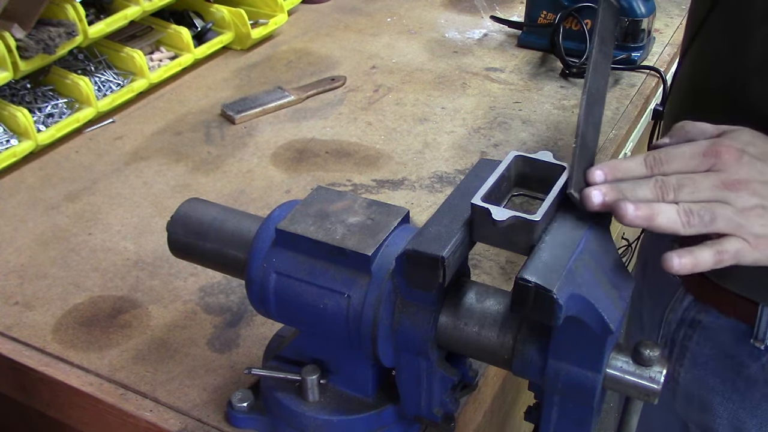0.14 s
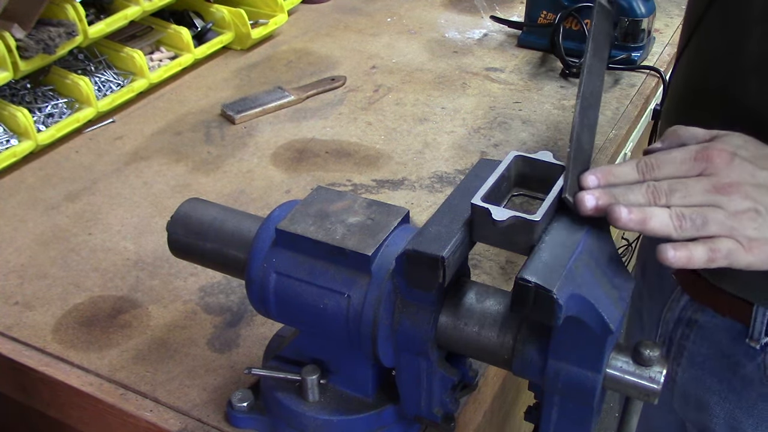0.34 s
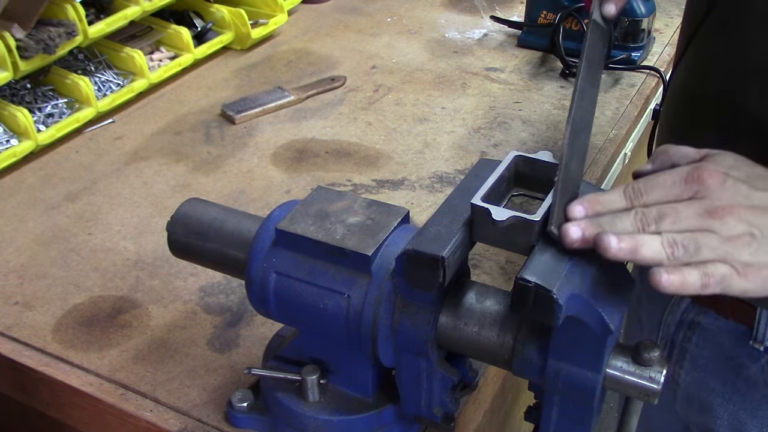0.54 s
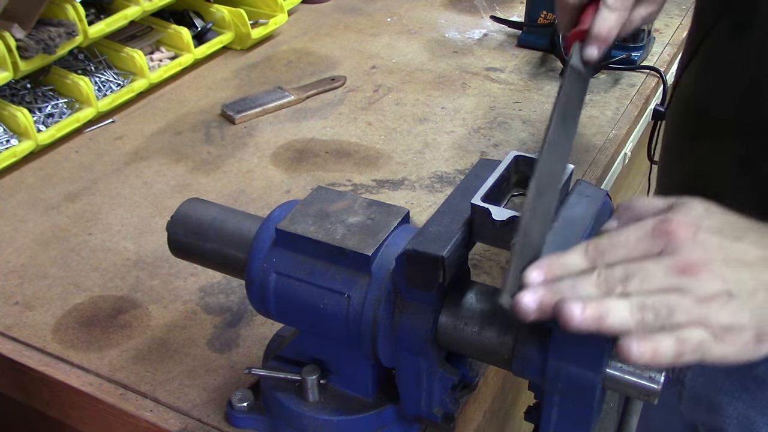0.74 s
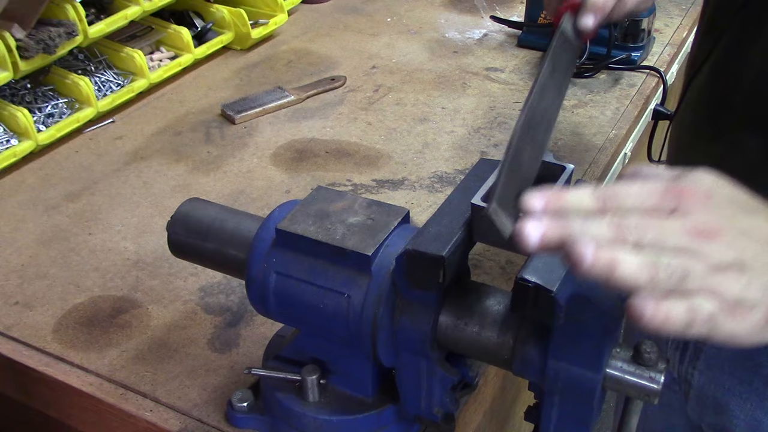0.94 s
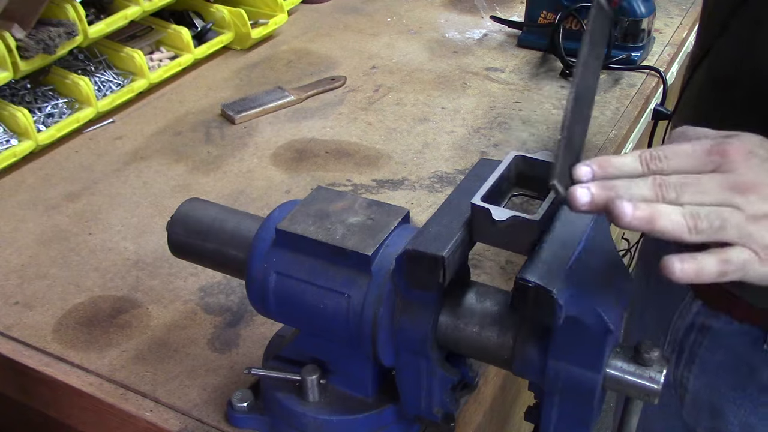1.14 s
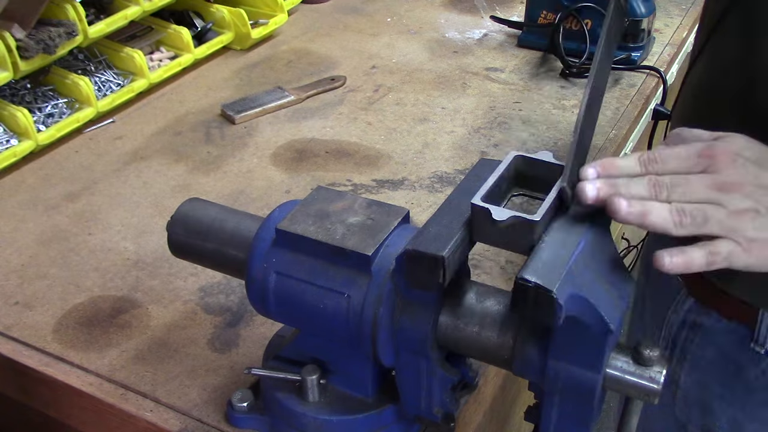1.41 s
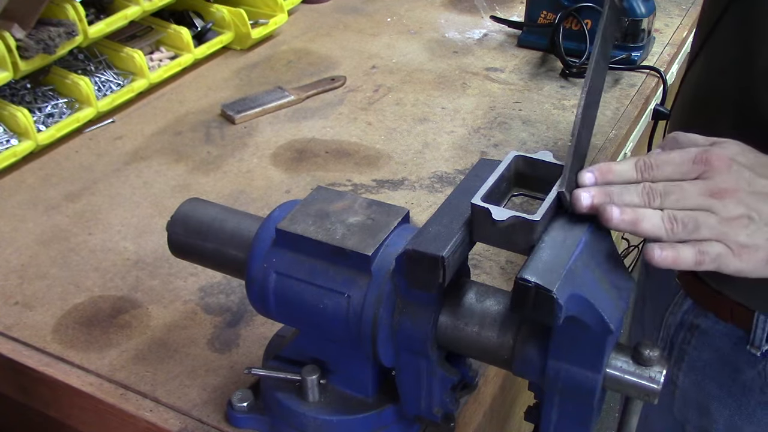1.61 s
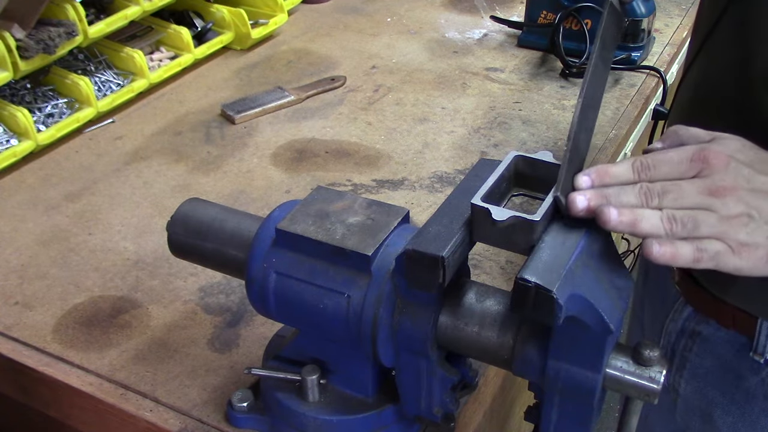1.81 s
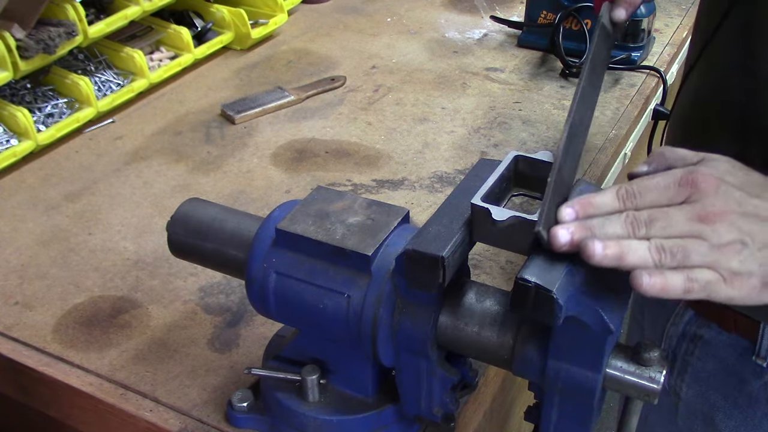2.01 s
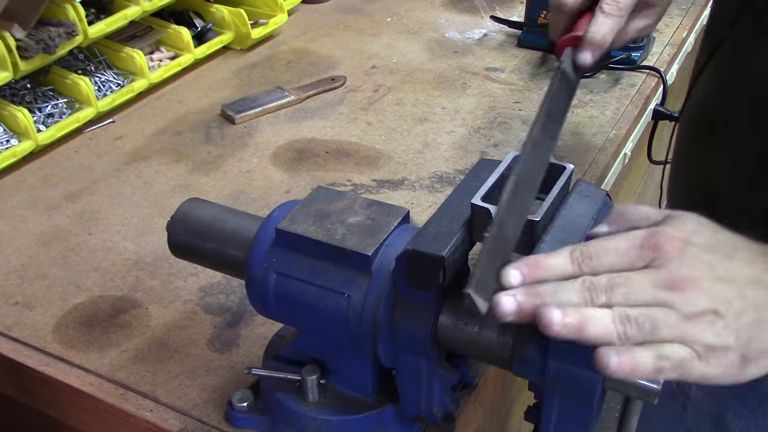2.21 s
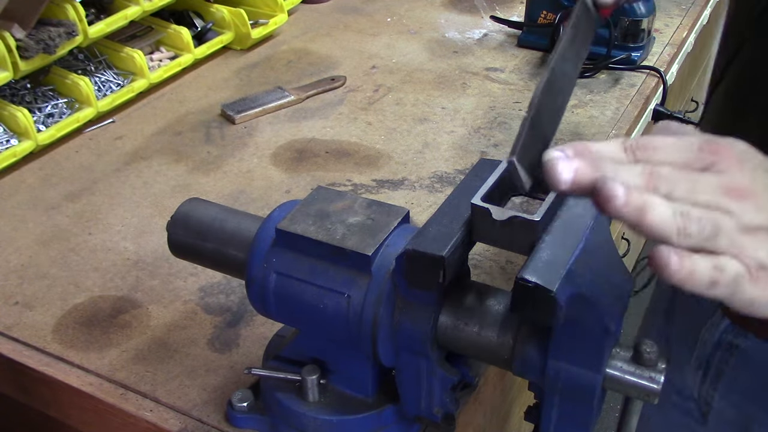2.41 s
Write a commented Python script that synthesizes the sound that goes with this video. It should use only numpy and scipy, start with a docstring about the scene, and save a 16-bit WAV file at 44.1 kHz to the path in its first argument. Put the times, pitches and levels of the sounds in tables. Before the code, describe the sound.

Two slow strokes of a file scrape on metal, each after a light tap.

```python
"""A hand file is set down with a tap on a metal casting held in a vice, then pushed across its edge.
Its teeth bite in a dense stream of impacts that ring the blade, whose modes change as the contact
travels from tip to heel. The teeth snag, or lock to the blade and squeal; thin tones ring on as the heel
slides off. The arms draw back with a swish, the bench sways, and the file touches down for a second
stroke. Throughout, the bench rumbles underneath and a small workshop reverberates."""
import sys
import numpy as np
from scipy import signal
from scipy.fft import rfft, irfft
from scipy.io import wavfile

SR = 44100
rng = np.random.default_rng(int(sys.argv[2]) if len(sys.argv) > 2 else 0)


def transcribe(signal):
    """Save signal, clipped to [-1, 1], as a 16-bit WAV file at the path in sys.argv[1]."""
    frames = np.atleast_2d(signal).T
    limited = np.clip(frames, -1, 1)
    pcm = np.round(limited * 32767).astype(np.int16)
    wavfile.write(sys.argv[1], SR, pcm)


N = 112454
T = np.arange(N) / SR

BRIGHT_PIVOT_HZ = 4250
FLUTTER_DB, FLUTTER_PER_S, JITTER_PER_S = 1.37, 89, 457
SCRATCH_DB, SCRATCH_HEEL_DB = -5.5, -3.5
VICE_DB, VICE_HEEL_DB, VICE_FOLLOW, VICE_FULL_DB = -39.5, -1.5, 0.54, -26
# spectrum of the teeth's dry scratch (frequency [Hz], spectral level [dB])
SCRATCH_SPECTRUM = [(150, -43.5), (500, -7), (1200, -11.5), (1850, -11), (2420, 2), (9000, -2.5),
                    (15800, -16.5)]
# one path per stroke (time [s], level [dB], brightness [dB/octave], contact place [0 tip to 1 heel])
STROKE_PATHS = [
    [(.37, -46.5, -3, 0.26), (.45, -29.5, -1.5, 0.13), (.5, -27, 0, 0.33), (.64, -24, 1.5, 0.32),
     (.69, -25.5, 2.5, 0.69), (.75, -22, 5, 0.88), (.82, -22, 2.5, 1), (.848, -23.5, 0.5, 0.92),
     (.862, -35, -4.5, 0.44)],
    [(1.79, -55, -1.5, 0.21), (1.84, -36.5, -3, 0.092), (1.92, -30.5, 0.5, 0.2), (2.0, -26.5, 1, 0.84),
     (2.09, -26, 1.5, 0.45), (2.15, -22, 3, 0.76), (2.198, -25, 4, 0.94), (2.218, -24, 4, 0.99),
     (2.242, -26, 5, 0.74), (2.256, -34.5, -1, 0.51)],
]
def stroke(path):
    """Impact excitation: the teeth scratch the edge, ring the blade and shake the vice."""
    times, *columns = np.transpose(path)
    level_db, bright_db, place = (np.interp(T, times, c) for c in columns)
    touching = (T > times[0]) * (T < times[-1])
    heel = np.clip(2 * place - 1, 0, 1)
    teeth = bites() * amp(-0.1 * wander(per_s=190)) * touching  # very slight judder
    push = teeth * amp(level_db)
    scratch = unit_rms(coloured(push, SCRATCH_SPECTRUM)) * np.std(push)
    treble = coloured(scratch, [(BRIGHT_PIVOT_HZ / 2, -30), (BRIGHT_PIVOT_HZ * 2, 0)])
    scratch += treble * (amp(2 * bright_db) - 1)
    scratch *= amp(SCRATCH_DB + SCRATCH_HEEL_DB * heel)
    vice_db = VICE_DB + VICE_FOLLOW * np.minimum(level_db - VICE_FULL_DB, 0) + VICE_HEEL_DB * heel
    return blade(push, place, bright_db, FLUTTER_DB) + scratch + vice(teeth * amp(vice_db))


def bites(per_s=11000, spread_db=2):
    """Shot noise: the teeth make tiny impacts of uneven size at random instants."""
    size = amp(spread_db * np.minimum(rng.exponential(1, N), 5))
    return unit_rms(size * rng.choice([-1., 1.], N) * (rng.random(N) < per_s / SR))


STIFFEN_HZ, STIFFEN_JITTER = 1373, 0.54
# blade modes (frequency [Hz], bandwidth [Hz], weight for contact at tip [dB], middle [dB], heel [dB])
BLADE_MODES = [(2544, 97, -8.5, -1, 2), (2930, 120, -12, 0.5, 1.5), (3573, 170, -5.5, -13.5, -4),
               (5170, 137, 10, -4, -4.5), (5110, 350, 3.5, -1, -3.5), (6300, 148, -14, 1.5, -0.5),
               (6965, 220, -16, -19, -2), (8083, 100, -9.5, -7.5, 0), (9810, 120, -17, -16.5, -2.5),
               (10850, 330, -29, -9.5, -6.5), (12010, 440, -31, -19, -19)]
def blade(push, place, bright_db, flutter_db=0):
    """Modal superposition: the place of contact sets how strongly each mode is driven."""
    # contact mid-blade is an unsteady spring that raises and smears the low modes
    spring = np.sin(np.pi * np.clip(place, 0, 1) ** 0.81) ** 2
    spring *= np.maximum(1 + STIFFEN_JITTER * wander(JITTER_PER_S), 0)
    ringing, power = np.zeros(N), 0
    for k, (hz, width, *by_place) in enumerate(BLADE_MODES):
        weight = amp(np.interp(place, [0, .5, 1], by_place))
        flutter = flutter_db * wander(FLUTTER_PER_S) if flutter_db else 0
        gain = amp(bright_db * np.log2(hz / BRIGHT_PIVOT_HZ) + flutter)
        stiffened_hz = np.sqrt(hz ** 2 + spring * STIFFEN_HZ ** 2)
        ringing += (-1) ** k * ring(push * weight * gain, stiffened_hz, width)
        power += weight ** 2
    return ringing / np.sqrt(power)


# squeals (time [s], duration [s], start [Hz], end [Hz], rms wobble [Hz], level [dB])
SQUEAL_TONES = [(.41, .165, 5200, 5450, 240, -29.5), (.748, .114, 5330, 5030, 150, -24),
                (.795, .05, 8140, 8130, 70, -26.5), (2.17, .082, 5330, 5030, 170, -28),
                (2.2, .052, 2550, 2600, 75, -25), (2.207, .043, 9750, 9700, 230, -27)]
def squeal(s, length, start_hz, end_hz, wobble_hz, db):
    """Self-sustained oscillation: the teeth lock to the blade in a tone that slides and flutters."""
    along = progress(s, length)
    hz = start_hz + (end_hz - start_hz) * along + wobble_hz * wander(JITTER_PER_S)
    swell = np.sqrt(2 * np.maximum(np.sin(np.pi * along), 0))
    return amp(db + FLUTTER_DB * wander(FLUTTER_PER_S)) * swell * np.sin(phase(hz))


# snags of the teeth (time [s], duration [s], level [dB])
SNAGS = [(.655, .025, -27), (.681, .009, -16), (.692, .005, -14), (.6985, .004, -13), (.731, .006, -23)]
def snags(cutoff_hz=9700, knock_db=-15):
    """Pulsed excitation: snagging teeth bite harder, scratching, ringing the blade and jarring the vice."""
    force = sum(amp(db) * np.sqrt(np.maximum(np.sin(np.pi * progress(s, length)), 0))
                for s, length, db in SNAGS)
    push = bites() * force
    lowpass = signal.butter(2, cutoff_hz, fs=SR, output="sos")
    scratch = unit_rms(signal.sosfilt(lowpass, coloured(push, SCRATCH_SPECTRUM))) * np.std(push)
    return blade(push, place=0.06, bright_db=2.5) / 2 + scratch + amp(knock_db) * vice(push) / 2


TICK_DB, BOUNCE_S, BOUNCE_DB = -30.5, 0.001062, -9.5
ECHO_BURST_DB, ECHO_BURST_S = -18.5, 0.011
CASTING_HZ, CASTING_WIDTH_HZ, CASTING_DB = 550, 10, -11
# spectrum of the dense burst of early echoes after a tap (frequency [Hz], spectral level [dB])
ECHO_BURST_SPECTRUM = [(300, -30.5), (600, -10), (2000, -1.5), (5000, -4), (7800, -8.5), (9500, -29.5)]
# the file touches down (time [s], steel level [dB], brightness [dB/octave], knock level [dB])
TOUCHDOWNS = [(0.2421, 20, -3.5, -6), (1.4989, -1, -14.5, -4.5), (1.574, -19.5, -1, -27.5)]
def tap(s, db, bright_db, knock_db):
    """Impulse response: a blow with one bounce ticks and rings blade, vice and casting, and a short dense burst
    of early echoes follows."""
    blow = np.zeros(N)
    blow[round(s * SR)] = 1
    blow[round(s * SR) + round(BOUNCE_S * SR)] += amp(BOUNCE_DB)
    tick = signal.sosfilt(signal.butter(2, [550, 6500], "band", fs=SR, output="sos"), blow)
    decay = np.exp(-np.maximum(T - s, 0) / ECHO_BURST_S) * (T > s)
    echo_burst = coloured(rng.standard_normal(N), ECHO_BURST_SPECTRUM) * decay
    echo_burst /= np.linalg.norm(echo_burst)
    steel = blade(blow, 0, bright_db) / 2 + amp(TICK_DB) * tick + amp(ECHO_BURST_DB) * echo_burst
    knock = vice(tick) / 2 + amp(CASTING_DB) * ring(blow, CASTING_HZ, CASTING_WIDTH_HZ)
    return amp(db) * steel + amp(knock_db) * knock


# lightly damped blade modes (frequency [Hz], bandwidth [Hz], gain [dB])
FREE_MODES = [(2512, 10.6, -31.5), (8150, 7.5, -36.5)]
def after_ring(drive):
    """Free decay: narrow modes driven during the stroke ring on after the heel slides off."""
    return sum(amp(db) * ring(drive, hz, width) for hz, width, db in FREE_MODES)


# modes of casting, vice and bench (frequency [Hz], bandwidth [Hz], gain [dB])
VICE_MODES = [(48.5, 22, 3), (351, 57, 2), (581.6, 31, -11), (677, 62, -6), (1165, 280, -2.5),
              (1342, 62, 0), (1800, 300, -5.5)]
def vice(push):
    """Forced vibration: casting, vice and bench respond at their low resonances."""
    return sum((-1) ** k * amp(db) * ring(push, hz, width)
               for k, (hz, width, db) in enumerate(VICE_MODES)) / 2


# jolts of the bench (time [s], frequency [Hz], level [dB])
JOLTS = [(0.852, 46, -27), (1.126, 77, -30), (1.271, 48.5, -25.5), (1.506, 36.1, -30)]
def bench_sway(s, hz, db, rise_cycles=0.55):
    """Damped oscillation: the jolted bench sways for a few cycles."""
    cycles = np.maximum(T - s, 0) * hz
    envelope = cycles / rise_cycles * np.exp(1 - cycles / rise_cycles)
    return amp(db) * envelope * np.sin(2 * np.pi * cycles)


# the arms draw back (time [s], duration [s], start [Hz], end [Hz], level [dB])
ARM_SWISHES = [(-.1, 0.22, 1605, 1383, -59), (0.841, 0.47, 1250, 1101, -57.5), (2.24, 0.3, 1864, 1300, -50)]
def swish(s, length, start_hz, end_hz, db, width_hz=620):
    """Narrow-band noise: the arms' soft swish swells and fades as its centre frequency glides."""
    along = progress(s, length)
    angle = phase(start_hz + (end_hz - start_hz) * along)
    band = wander(width_hz / 2) * np.cos(angle) + wander(width_hz / 2) * np.sin(angle)
    return amp(db) * np.sin(np.pi * along) * band


EARLY_DB, EARLY_T60_S, ROOM_DELAY_S = -16, 0.081, 0.0029
# the workshop's tail (frequency [Hz], reverberation time [s], level [dB])
ROOM_DECAY = [(250, 1, -5), (1215, 0.64, 0), (2610, 0.5, -9), (5000, 0.55, -12), (7450, 0.4, -12),
              (13500, 0.47, -22)]
def workshop(x):
    """Reverberation: early reflections off the bench, then a tail that dies sooner in the treble."""
    hz, t, bands = signal.stft(rng.standard_normal(SR), SR, nperseg=256)
    rate = np.log(1000) / read(ROOM_DECAY, hz)[:, None]
    bands *= amp(read(ROOM_DECAY, hz, 2))[:, None] * np.exp(-rate * t) * np.sqrt(2 * rate / SR)
    age = T[:SR]
    tail = signal.istft(bands, SR, nperseg=256)[1][:SR] * (age > ROOM_DELAY_S)
    early = rng.standard_normal(SR) * amp(-60 * age / EARLY_T60_S) * (age > ROOM_DELAY_S / 2)
    return signal.fftconvolve(x, tail + amp(EARLY_DB) * early / np.linalg.norm(early))[:N]


# spectra of the bench's rumble and the shop's air (frequency [Hz], spectral level [dB])
RUMBLE_SPECTRUM = [(15, -37.5), (28, -0.5), (42, 2.5), (58, -6), (140, -13), (300, -34), (900, -88.5)]
AIR_SPECTRUM = [(30, 4.5), (100, -1.5), (200, 0), (600, -11), (1200, -23.5), (15800, -36)]
def background(rumble_db=-40.5, air_db=-48):
    """Stationary noise: a low rumble under the still air of the shop."""
    rumble = unit_rms(coloured(rng.standard_normal(N), RUMBLE_SPECTRUM))
    air = unit_rms(coloured(rng.standard_normal(N), AIR_SPECTRUM))
    return amp(rumble_db) * rumble + amp(air_db) * air


def ring(x, hz, width):
    """Resonance: one mode, steady or gliding, that keeps the power of white noise."""
    turn = np.exp(1j * phase(hz))
    pole = np.exp(-np.pi * width / SR)
    envelope = signal.lfilter([1], [1, -pole], x / turn + 1e-18)
    return np.sqrt(2 * (1 - pole ** 2)) * (turn * envelope).real


def wander(per_s):
    """Random modulation: low-passed noise of rms 1."""
    rolloff = 1 + (np.fft.rfftfreq(N, 1 / SR) / per_s) ** 2
    return unit_rms(irfft(rfft(rng.standard_normal(N)) / rolloff, N))


def coloured(x, spectrum):
    """Linear filtering: each frequency takes its gain from a table."""
    return irfft(rfft(x) * amp(read(spectrum, np.fft.rfftfreq(len(x), 1 / SR))), len(x))


def read(points, hz, column=1):
    """Interpolation along a log-frequency axis."""
    table = np.transpose(points)
    return np.interp(np.log(hz + 1), np.log(table[0] + 1), table[column])


def phase(hz):
    """Phase as the integral of frequency."""
    return 2 * np.pi * np.cumsum(hz * np.ones(N)) / SR


def progress(s, length):
    """Linear ramp from 0 to 1 across an event."""
    return np.clip((T - s) / length, 0, 1)


def amp(db):
    """Decibels to amplitude ratio."""
    return 10 ** (np.asarray(db) / 20)


def unit_rms(x):
    """Normalisation to rms 1."""
    return x / np.sqrt(np.mean(x ** 2) + 1e-20)


def scene():
    """Superposition: all sources and the room's answer, alike in both channels."""
    filing = sum(stroke(path) for path in STROKE_PATHS)
    squeals = sum(squeal(*row) for row in SQUEAL_TONES)
    work = filing + after_ring(filing + squeals) + snags() + sum(tap(*row) for row in TOUCHDOWNS)
    movement = sum(swish(*row) for row in ARM_SWISHES) + sum(bench_sway(*row) for row in JOLTS)
    # squeals beam off the flat of the blade and reach the room weakly
    echo = workshop(work + amp(-11) * squeals)
    mono = work + squeals + echo + movement + background()
    return np.array([mono, mono])


def record(dry):
    """Band limiting: a steep low-pass at 15.8 kHz."""
    lowpass = signal.firwin(511, 15800, window=("kaiser", 9), fs=SR)
    return signal.oaconvolve(dry, lowpass[None], "same")


dry = scene()
out = record(dry)
transcribe(out)
```